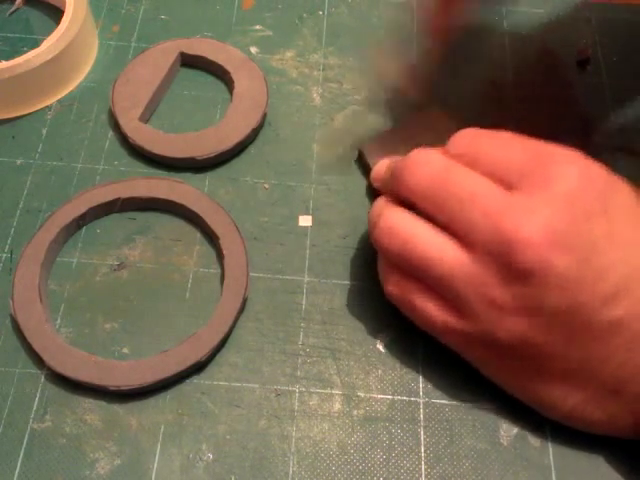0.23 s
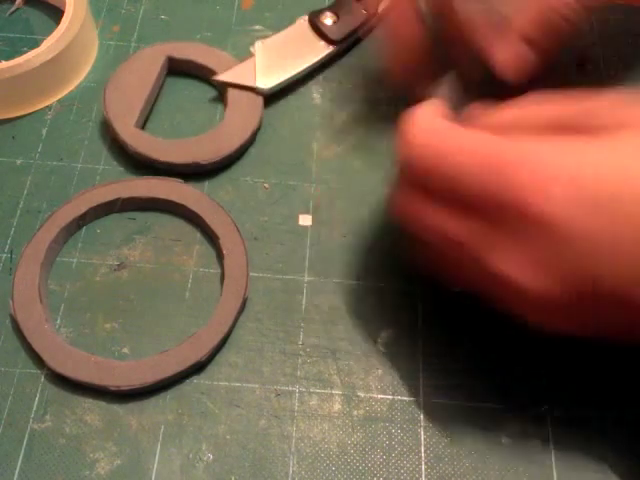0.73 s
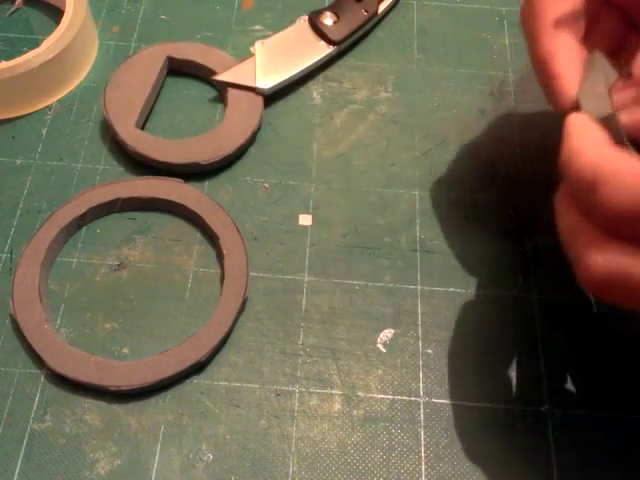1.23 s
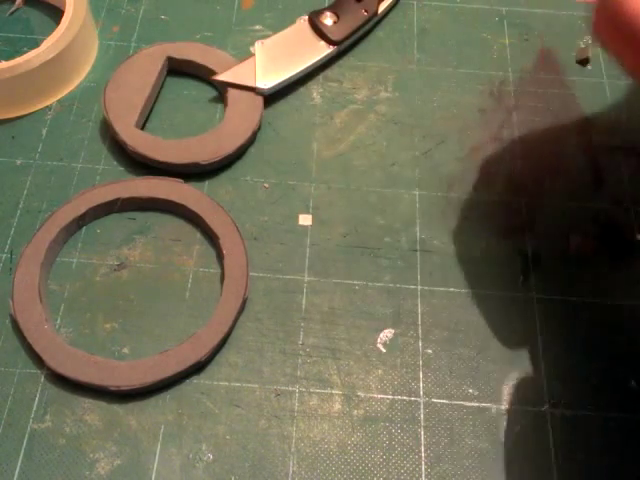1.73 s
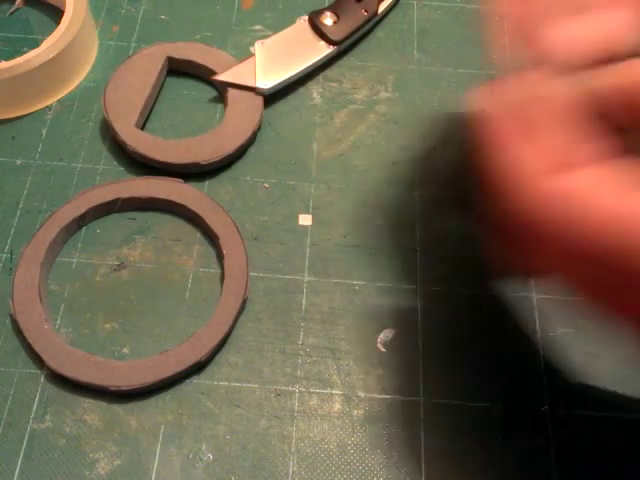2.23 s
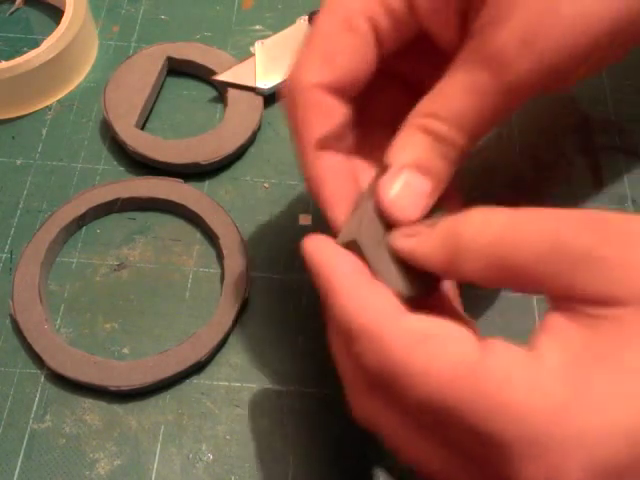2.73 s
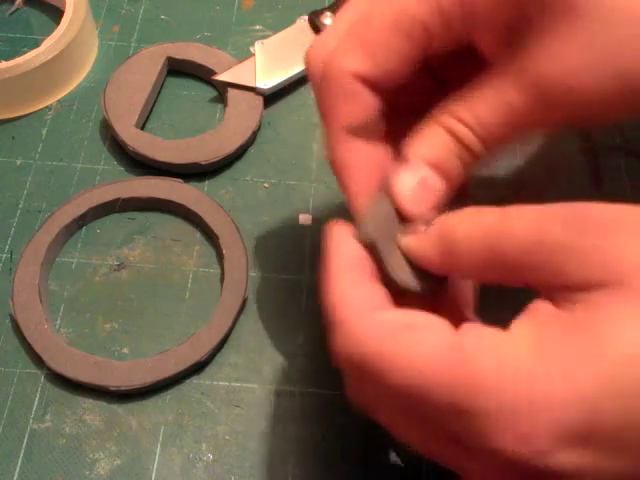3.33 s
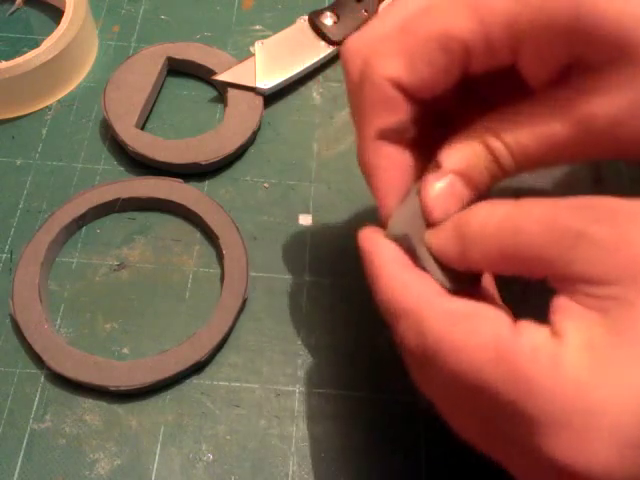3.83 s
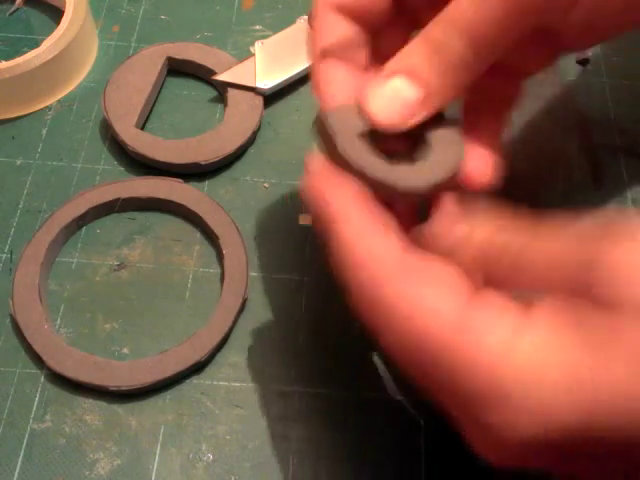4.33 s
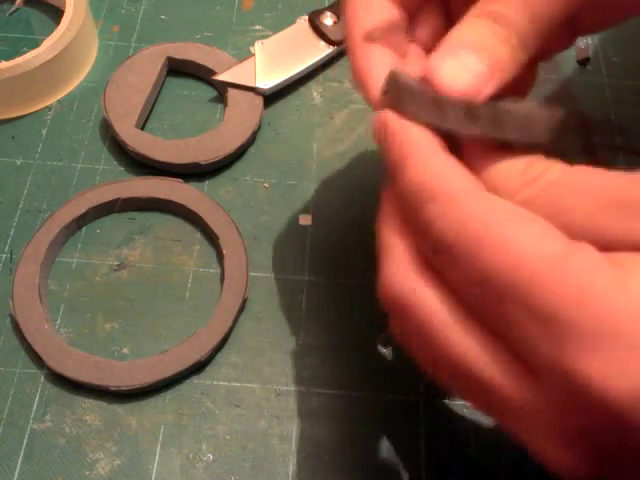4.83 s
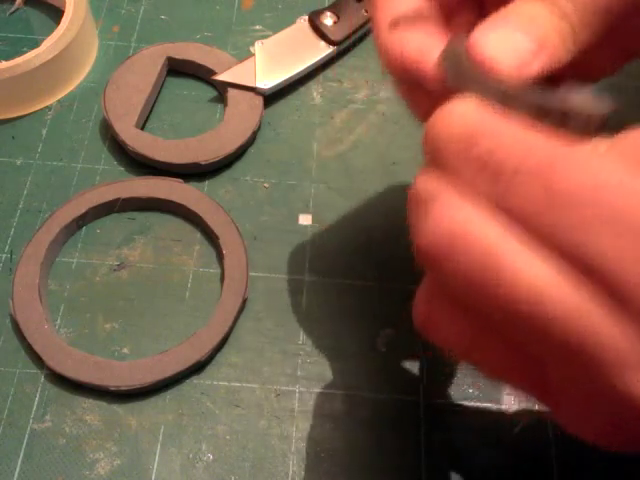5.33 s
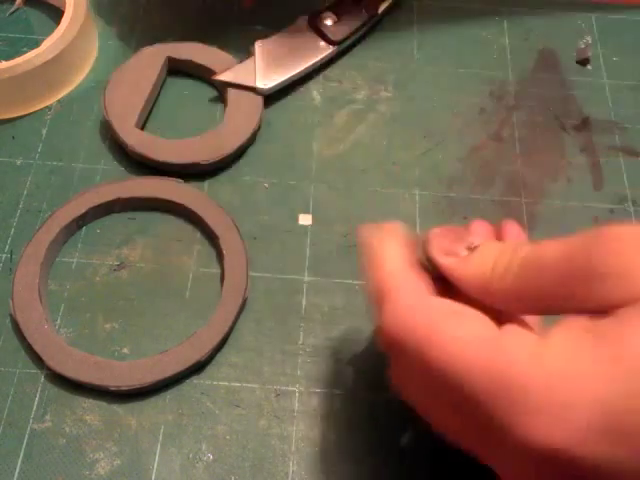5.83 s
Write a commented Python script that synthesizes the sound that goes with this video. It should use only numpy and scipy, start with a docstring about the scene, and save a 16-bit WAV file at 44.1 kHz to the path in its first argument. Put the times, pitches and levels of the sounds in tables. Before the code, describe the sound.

Close handling of foam in a quiet room: a knife clunks onto a mat, nails tick faintly, foam cracks sharply, hands land softly.

```python
"""Close up in a small, quiet room, fingers rub a piece of foam, and a hand slides over it with a dull sound.
Half a second in, a utility knife is laid on a cutting mat: filtered clicks thud and table tones ring.
Fingers then rub on (noise made of tiny catches), and a nail picks small snaps (bursts of clicks) off the edge.
Near four seconds the foam cracks loudly: torn noise, a pop and ringing hands; one faint blow follows.
More rubs and snaps lead to the end, where the hands come down on the mat; echoes and a soft hiss surround it all."""
import sys
import numpy as np
from scipy import signal
from scipy.fft import rfft, irfft
from scipy.io import wavfile
from scipy.ndimage import uniform_filter1d

SR = 44100
rng = np.random.default_rng(int(sys.argv[2]) if len(sys.argv) > 2 else 0)


def store_pcm(level_fs):
    """Save levels as 16-bit WAV."""
    pcm = np.round(np.clip(level_fs, -1, 1) * 32767).astype(np.int16)
    wavfile.write(sys.argv[1], SR, np.atleast_2d(pcm).T)


N = 267951
TIME = np.arange(N) / SR  # s


def gain_of(db):
    """Turns decibels into a factor for the sound pressure."""
    return 10 ** (np.asarray(db) / 20)


def evened(x):
    """Scales a signal to an rms (average strength) of 1."""
    return x / np.sqrt(np.mean(x ** 2) + 1e-20)


def read(points, hz):
    """Reads a curve between its points, with frequency on a logarithmic axis as in hearing."""
    point_hz, value = np.transpose(points)
    return np.interp(np.log(hz + 1), np.log(point_hz + 1), value)


def add(mix, start_s, sound):
    """Adds a sound to the mix from its start time, cut off where the mix ends."""
    part = mix[round(start_s * SR):][:len(sound)]
    part += sound[:len(part)]


def coloured(x, points):
    """Filters a steady signal by a spectrum and scales it to rms 1."""
    gain = gain_of(read(points, np.fft.rfftfreq(N, 1 / SR)))
    return evened(irfft(rfft(x) * gain, N))


def drift(top_hz):
    """Makes a slow random wander of rms 1 by keeping only the noise below top_hz."""
    spectrum = rfft(rng.standard_normal(N))
    slow = np.fft.rfftfreq(N, 1 / SR) < top_hz
    return evened(irfft(spectrum * slow, N))


def impulse(points, tilt_db=0, ring_hz=1000, ring_db=0, width=0.22, size=4096):
    """Makes a click of peak 1: a spectrum, tilted per octave by the contact's hardness, with one resonance."""
    hz = abs(np.fft.fftfreq(size, 1 / SR))
    db = read(points, hz) + tilt_db * np.log2(np.clip(hz, 200, 9000))
    db += ring_db / (1 + ((hz / ring_hz - 1) / width) ** 2)
    # this phase packs the energy into the start of the click (minimum phase)
    spectrum = np.exp(np.conj(signal.hilbert(np.log(gain_of(db)))))
    click = np.fft.ifft(spectrum).real[:size // 2]
    return click / abs(click).max()


def ringing(modes):
    """Adds up the fading sine tones (modes) in which a struck object rings after one blow."""
    t = TIME[:SR // 3]
    return sum(gain_of(level_db - 60 * t / t60_s) * np.sin(2 * np.pi * pitch_hz * t)
               for pitch_hz, level_db, t60_s in modes)


def background():
    """Makes low room noise that wavers a little, under a steady thin hiss."""
    # colour of the quiet room: pitch_hz [Hz], relative level_db [dB per Hz]
    quiet_colour = [(8.8, -15.5), (15, 6.5), (38, -6), (106, -7), (179, -10), (269, -13.5), (303, -13),
                    (430, -16.5), (497, -18.5), (610, -17), (685, -17), (1160, -20.5), (2620, -33),
                    (12000, -53), (16000, -50)]
    quiet_db, waver_db = -60.5, 0.8
    noise = gain_of(quiet_db) * coloured(rng.standard_normal(N), quiet_colour)
    low = signal.sosfilt(signal.butter(1, 2500, fs=SR, output="sos"), noise)
    # only the low part changes level
    return noise + low * (gain_of(waver_db * drift(14)) - 1)


def room(x, near_db=9, near_s=0.0058):
    """Adds dense early echoes from the desk and things on it, then a short tail fading band by band."""
    # colour of what the room gives back: pitch_hz [Hz], level_db [dB]
    room_colour = [(120, -0.5), (300, -14), (520, -12.5), (900, -2), (2000, -7), (4000, -3.5), (6500, -5.5),
                   (14000, -3.5)]
    # time the echoes take to fade by 60 dB: pitch_hz [Hz], t60_s [s]
    fade_times = [(150, 0.22), (500, 0.14), (1500, 0.22), (6000, 0.2), (14000, 0.1)]
    t = TIME[:SR // 2]
    echoes_per_s, first_echo_s = 6000, 0.0013
    echoes = rng.choice([-1., 1.], len(t)) * (rng.random(len(t)) < echoes_per_s / SR)
    echoes *= t > first_echo_s
    echoes *= gain_of(near_db * np.exp(-t / near_s))  # the early ones are stronger
    hz, s, bands = signal.stft(echoes, SR, nperseg=256)
    bands = bands * gain_of(-60 * s / read(fade_times, hz)[:, None])
    # every band gets the same energy, then the room's colour
    bands *= gain_of(read(room_colour, hz))[:, None] / np.linalg.norm(bands, axis=1, keepdims=True)
    tail = signal.istft(bands, SR, nperseg=256)[1] * np.sqrt(3) / 256  # rescaled for the window
    return signal.fftconvolve(x, tail)[:N]


def friction(points, grains_per_s, spread_db, flutter_db):
    """Makes rubbing from countless uneven catches; level and colour waver with the pressure and the grip."""
    sizes = gain_of(spread_db * np.minimum(rng.exponential(1, N), 4))
    catches = rng.standard_normal(N) * sizes * (rng.random(N) < grains_per_s / SR)
    bands = signal.stft(catches, nperseg=512)[2]
    # smooth random patches over pitch and time shift the colour
    patches = uniform_filter1d(rng.standard_normal(bands.shape), size=14, axis=0)
    patches = evened(uniform_filter1d(patches, size=12, axis=1))
    patch_db = 1.8
    catches = signal.istft(bands * gain_of(patch_db * patches), nperseg=512)[1][:N]
    return evened(coloured(catches, points) * gain_of(flutter_db * drift(60)))


def strokes(rows, swell_db):
    """Shapes each stroke: it grips, swells by swell_db as pressure builds, eases off as much and lets go."""
    grip_s = 0.014  # time to grip, and to let go
    out = np.zeros(N)
    for start_s, length_s, level_db, peak_place in rows:
        peak_place = np.clip(peak_place, .01, .99)
        pressure = np.interp((TIME - start_s) / length_s, [0, peak_place, 1], [0, 1, 0])
        to_nearest_end_s = np.minimum(TIME - start_s, start_s + length_s - TIME)
        contact = np.clip(to_nearest_end_s / grip_s + .5, 0, 1)
        out += contact * gain_of(level_db - swell_db * (1 - pressure))
    return out


def handling(rub_db=-1, slide_db=-3):
    """Makes fingertips hiss over the foam's cells, hand and knife slide, and the arm shift on the table."""
    # the four stroke tables: start_s [s], length_s [s], level_db at the peak [dB], peak_place [0-1]
    # fingertips rubbing over the foam (level before rub_db)
    rub_strokes = [(0.09, 0.17, -67.5, 1), (0.355, 0.037, -67.5, .65), (0.43, 0.21, -67, 0.52),
                   (0.522, 0.033, -57, 0.65), (0.67, 0.083, -59, 0.9), (0.83, 0.085, -71, 0),
                   (0.89, 0.22, -78, 0.57), (1.425, 0.047, -72, 0), (1.545, 0.093, -67.5, 0.2),
                   (1.635, 0.13, -65.5, 0.2), (2.1, 0.18, -77.5, .7), (2.3, 0.13, -72, 0.24),
                   (2.452, 0.042, -63, 0.4), (2.75, 0.017, -68, 0.4), (4.16, 0.12, -67.5, 0.58),
                   (4.38, 0.3, -74, .45), (4.755, 0.028, -69.5, 0.43), (4.825, 0.065, -63.5, 0.43)]
    # hand and foam sliding (level before slide_db)
    slide_strokes = [(0.11, 0.49, -54.5, 0.35), (1.545, 0.24, -55.5, 0.53), (1.8, 0.45, -60.5, 0.54),
                     (2.33, 0.43, -62, 0.47), (4.31, 0.28, -54.5, 0.72), (4.58, 0.55, -64.5, 0.92)]
    # the knife handle dragging on the mat as it is laid down
    drag_strokes = [(0.52, 0.12, -52.5, 0.43), (0.67, 0.1, -53.5, .85)]
    # the arm shifting on the table
    shift_strokes = [(0.11, 0.66, -54, 0.2), (2.3, 0.41, -62.5, 0.4), (3.96, 0.16, -57, .4),
                     (4.21, 0.33, -63, 0), (5.46, 0.26, -59.5, 0)]
    # colours of the rubbing, the sliding and the arm's rumble: pitch_hz [Hz], relative level_db [dB]
    rub_colour = [(300, -11.5), (1500, 0), (2500, 5.5), (4000, 1), (6000, 1), (7500, -1), (9000, -0.5),
                  (10500, -4), (14000, -8), (16000, -15.5)]
    slide_colour = [(40, -8), (150, 4), (400, 3.5), (850, -1), (1400, -9.5), (2200, -12.5), (3500, -24),
                    (6000, -31.5), (12000, -40)]
    rumble_colour = [(10, 0), (30, -4.5), (70, -8.5), (170, -11), (400, -31), (2000, -59)]

    rubbing = gain_of(rub_db) * strokes(rub_strokes, swell_db=12.5)
    rub = rubbing * friction(rub_colour, grains_per_s=6500, spread_db=1.5, flutter_db=2.9)
    sliding = gain_of(slide_db) * strokes(slide_strokes, swell_db=5) + strokes(drag_strokes, swell_db=5)
    slide = sliding * friction(slide_colour, grains_per_s=5000, spread_db=2.9, flutter_db=1.04)
    rumble = strokes(shift_strokes, swell_db=4) * coloured(rng.standard_normal(N), rumble_colour)
    return rub + slide + rumble


def knocks():
    """Lands knife and knuckles on the mat: each blow is a dead thud plus the table's low ringing tones."""
    # blows on the mat-covered table: start_s [s], level_db [dB], brightness [dB per octave]
    blows = [(0.5276, -36, -2), (0.553, -30.5, -12), (0.5861, -34, -6), (0.6216, -8, -0.42),
             (0.651, -46, 0), (0.6587, -35, 1), (0.6681, -37, -5.5), (0.7179, -25.5, -1.5),
             (4.2312, -38.5, 1), (5.9791, -34.5, -0.5), (5.9880, -35.5, 2.4)]
    # colour of the mat's thud: pitch_hz [Hz], relative level_db [dB]
    thud_colour = [(40, -43), (100, -33), (200, 0), (340, 5.5), (450, 1.5), (540, -5.5), (780, -6.5),
                   (1050, -13.5), (2100, -20), (3000, -30.5), (3900, -37.5), (5300, -37.5), (12500, -47),
                   (16000, -70.5)]
    # ringing of the table top: pitch_hz [Hz], level_db against the thud's peak [dB], t60_s [s]
    table_modes = [(125.7, -29, 0.16), (222, -40, 0.24), (306, -32.5, 0.25), (355, -41, 0.226),
                   (427, -26, 0.17), (580, -36.5, .08), (862, -36.5, .12), (1280, -41.5, .08),
                   (2040, -38, .05)]
    out = np.zeros(N)
    for start_s, level_db, tilt_db in blows:
        add(out, start_s, gain_of(level_db) * impulse(thud_colour, tilt_db))
        add(out, start_s, gain_of(level_db) * ringing(table_modes))
    return out


def snaps(crackle=0.81, creep=0.047, creep_s=0.0065, radiated_db=-2):
    """Lets a nail creep, slip off the edge with a click, then make a quickly dying run of smaller slips."""
    # nails snapping off the foam's edge: start_s [s], level_db of the main click before its resonance and
    # slips blend [dB], brightness [dB per octave], crackle_s fading time [s], ring_hz [Hz], ring_db [dB]
    nail_snaps = [(1.6105, -54, 3, 0.0027, 10000, 2), (1.8228, -50, 6, 0.0069, 4740, 9.5),
                  (2.0460, -59, 1, 0.0068, 7500, 4), (2.341, -53, 3.5, 0.0025, 4600, 6),
                  (3.0540, -25.5, 4, 0.0011, 6180, 15.5), (3.0580, -36.5, -1.5, 0.001, 2300, 6.5),
                  (3.2185, -55, 1, 0.0048, 4000, 14), (3.399, -49.5, 1, 0.0084, 3350, 6),
                  (3.911, -51, 2, 0.00065, 3800, 5.5), (4.185, -63, 5, 0.0081, 7800, 5),
                  (4.9621, -55.5, 0, 0.00092, 2200, 6), (5.099, -55, 7, 0.002, 9000, -6),
                  (5.486, -44, 3, 0.0038, 4970, 11), (5.4884, -41.5, 8.5, 0.0013, 3060, 26),
                  (5.612, -54.5, -2, 0.0036, 2380, 5), (5.7907, -46, 2.5, 0.00081, 8600, 8),
                  (5.9590, -44, 2.5, 0.00062, 4460, 2), (5.9865, -44, -5, 0.0019, 2160, 20.5)]
    # colour of a snap between the fingers: pitch_hz [Hz], relative level_db [dB]
    snap_colour = [(50, -40), (150, -36), (300, -8.5), (600, 0.5), (1400, -9.5), (2300, -8), (3200, -19.5),
                   (4200, -24), (5200, -21.5), (7000, -24), (9000, -25.5), (12500, -32), (14500, -43),
                   (16000, -38)]
    lead = SR // 100  # samples of creeping before the click
    t = (np.arange(SR // 16) - lead) / SR
    slips_per_s = 7000
    direct, radiated = np.zeros(N), np.zeros(N)
    for start_s, level_db, tilt_db, crackle_s, ring_hz, ring_db in nail_snaps:
        slips = rng.choice([-1., 1.], len(t)) * (rng.random(len(t)) < slips_per_s / SR)
        before = creep * np.exp(-abs(t) / creep_s)
        after = crackle * np.exp(-abs(t) / crackle_s)
        slips *= np.where(t < 0, before, after)
        slips[lead] = 1  # the main click
        click = impulse(snap_colour, tilt_db, ring_hz, ring_db)
        add(direct, start_s + t[0], gain_of(level_db) * signal.fftconvolve(slips, click))
        # summed over all directions the peaks and dips even out: the room gets one smooth click
        strength = gain_of(level_db + radiated_db) * np.linalg.norm(slips)
        add(radiated, start_s, strength * impulse(snap_colour, tilt_db))
    return direct, radiated


def cracks(tear_db=-27, tear_s=0.001, radiated_db=3):
    """Tears cells in a rush that peaks as the foam lets go; the pop rings in the cupped hands and the room."""
    # the foam giving way: start_s [s], level_db of the pop before its ringing [dB]
    loud_cracks = [(3.9492, -14)]
    # colour of the crack: pitch_hz [Hz], relative level_db [dB]
    crack_colour = [(50, -26), (150, -12), (300, -1.5), (620, 2), (1400, -5), (2300, -12), (3200, -20.5),
                    (4200, -37), (5200, -20), (7000, -22), (9000, -25.5), (12500, -36), (16000, -56)]
    # hollow of the cupped hands and a nail: pitch_hz [Hz], level_db against the pop's peak [dB], t60_s [s]
    hand_modes = [(660, -18, 0.022), (950, -23, 0.054), (1410, -17, 0.028), (2230, -17.5, 0.013),
                  (5270, -24, 0.015), (6680, -32, 0.029)]
    lead = SR // 100  # samples of tearing before the pop
    t = np.arange(-lead, lead) / SR
    direct, radiated = np.zeros(N), np.zeros(N)
    for start_s, level_db in loud_cracks:
        tearing = gain_of(tear_db) * rng.standard_normal(len(t)) * np.exp(-abs(t) / tear_s)
        tearing = signal.fftconvolve(tearing, impulse(crack_colour, tilt_db=6.0))
        pop = impulse(crack_colour)
        add(direct, start_s + t[0], gain_of(level_db) * tearing)
        add(direct, start_s, gain_of(level_db) * pop)
        add(direct, start_s, gain_of(level_db) * ringing(hand_modes))
        add(radiated, start_s, gain_of(level_db + radiated_db) * pop)
    return direct, radiated


def scene():
    """Adds up everything on the desk and between the fingers, the room's echoes and the background."""
    desk = knocks() + handling()
    direct, radiated = np.add(snaps(), cracks())
    return (desk + direct + room(desk + radiated) + background())[None]


def record(dry):
    """Cuts off the highest treble with a steep low-pass filter."""
    edge_hz = 16100
    low_pass = signal.firwin(511, edge_hz, window=("kaiser", 9), fs=SR)
    return signal.oaconvolve(dry, low_pass[None], "same")


dry = scene()
out = record(dry)
store_pcm(out)
```